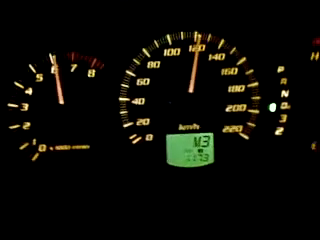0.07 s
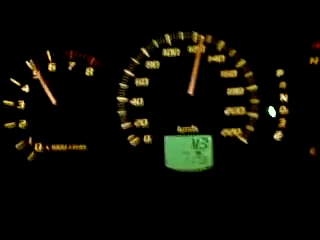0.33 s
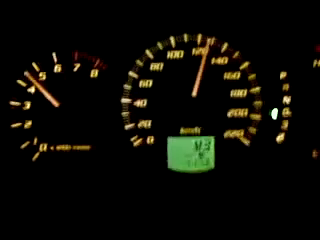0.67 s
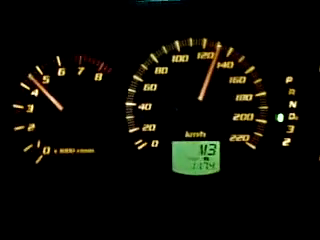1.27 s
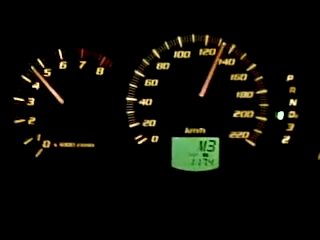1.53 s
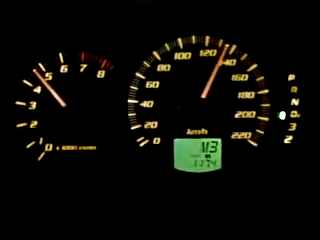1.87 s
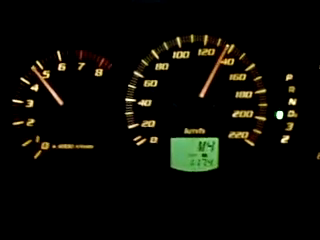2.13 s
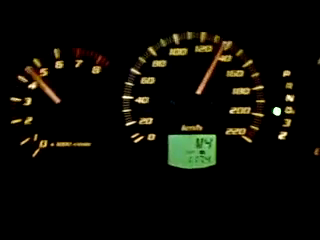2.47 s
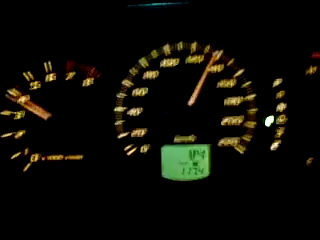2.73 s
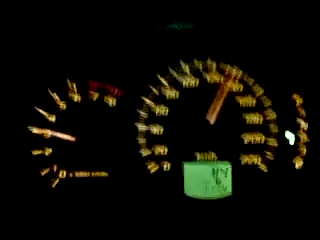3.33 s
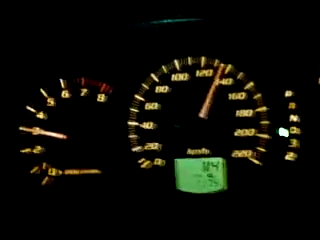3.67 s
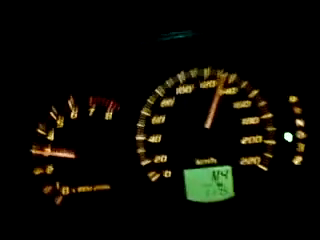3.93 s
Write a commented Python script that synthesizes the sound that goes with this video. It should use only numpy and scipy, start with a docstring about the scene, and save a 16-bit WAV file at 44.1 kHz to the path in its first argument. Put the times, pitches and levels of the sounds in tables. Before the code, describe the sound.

A turbocharged car engine drones at motorway speed, heard inside the cabin over steady road rumble and tyre roar. Its pitch drops with an upshift in the first 0.6 seconds, then climbs slowly. At about 2.4 seconds the throttle lifts and the turbo valve vents a short hiss. The engine sinks to a lower drone by 3 seconds, with soft low booms and two faint ticks near 4 seconds.

```python
"""A turbocharged four-cylinder engine drones at motorway speed, heard from inside the car.
Its firing sets the pitch, which drops with an upshift and climbs slowly under load. The throttle lifts,
the blow-off valve lets the turbo's spare air out with a hiss, and the engine sinks to a lower drone.
Road rumble, tyre roar, rushing air and low booms fill the cabin; two faint ticks come at the end."""
import sys
import numpy as np
from scipy.fft import rfft, irfft, next_fast_len
from scipy.io import wavfile
from scipy.ndimage import uniform_filter1d, map_coordinates

SR = 44100
rng = np.random.default_rng(int(sys.argv[2]) if len(sys.argv) > 2 else 0)


def bounce(signal):
    """Save signal as a 16-bit WAV file at the path given by the first command-line argument."""
    frames = np.transpose(np.atleast_2d(signal))
    limited = np.clip(frames, -1, 1)
    pcm = np.round(limited * 32767).astype(np.int16)
    wavfile.write(sys.argv[1], SR, pcm)


N = 176400  # 4 seconds

# The engine's main tone. Each row: time in seconds, firings per second, level in dB.
FIRING = [(0, 217.5, -33.5), (.1, 215, -35), (.26, 199.9, -36), (.34, 183.4, -41.5), (.395, 173.5, -31.5),
          (.46, 160.7, -35.5), (.52, 146.7, -30.5), (.58, 142.1, -33.5), (.8, 145, -30.5), (.9, 146, -36.5),
          (1.05, 146.8, -33.5), (1.5, 151.8, -34), (2.36, 156.9, -36.5), (2.5, 155.9, -42.5),
          (2.64, 154.5, -46.5), (2.7, 143, -34), (2.77, 135, -36), (2.82, 124, -39.5), (2.88, 114, -31.5),
          (2.99, 101.4, -36.5), (3.25, 102.6, -35), (3.5, 99.04, -35), (4, 97.33, -34.5)]
# How hard the engine works. Each row: time in seconds, level of overtones and growl in dB.
ENGINE_LOAD = [(0, -47.5), (.25, -42.5), (.42, -45.5), (.6, -44.5), (1.1, -46), (1.5, -45), (2, -47),
               (2.37, -46.5), (2.6, -57), (3, -55), (4, -54.5)]
# The overtones. Each entry: pitch as a multiple of the crankshaft's turning rate.
OVERTONE_MULTIPLES = [1, 1.5, 2.5, 3, 3.5, 4, 4.5, 5, 6, 7]
# Each entry: that overtone's relative level in dB.
OVERTONE_DB = [-10, -7, -9.5, -13.5, -12.5, -2, -10.5, -14, -13, -16.5]

# How loud each noise is. Each row: time in seconds, level in dB.
RUMBLE_LEVEL = [(0, -41), (.22, -36.5), (.32, -40.5), (.42, -34), (.56, -41), (.76, -36.5), (.95, -41.5),
                (1.1, -36), (1.45, -41.5), (2.08, -36), (2.3, -39.5), (2.55, -36.5), (2.95, -35.5),
                (3.05, -41.5), (3.4, -40), (3.9, -37.5)]
TYRE_LEVEL = [(0, -44.5), (.4, -43.8), (.6, -47), (1.2, -46), (2, -44.5), (3.3, -44), (4, -46)]
TREAD_LEVEL = [(0, -52), (.3, -54.5), (.85, -56.5), (2.1, -54.5), (2.46, -51), (2.65, -56), (3.2, -55),
               (4, -59.5)]
AIR_LEVEL = [(0, -60.5), (.5, -63.5), (.85, -65), (1.05, -63), (3.3, -64), (3.8, -68), (4, -65.5)]

# Each noise's colour, its mix of low and high. Each row: frequency in Hz, relative level in dB.
GROWL_COLOUR = [(100, -14.5), (220, -2.5), (330, 6.5), (450, -7), (650, -2), (900, -16), (1400, -13.5),
                (2200, -42), (4000, -61)]  # burning fuel
RUMBLE_COLOUR = [(20, -20.5), (30, -9.5), (41, -10.5), (53, -3.5), (66, -3.5), (85, -10), (120, -9),
                 (200, -43)]
TYRE_COLOUR = [(140, 5), (230, -5.5), (320, -6.5), (420, -11), (580, -11.5), (780, -17.5), (1000, -16.5),
               (1400, -18), (1750, -21.5), (2200, -27.5), (3000, -41)]
AIR_COLOUR = [(1200, -28.5), (2500, 6.5), (4000, 3.5), (5500, 2.5), (8000, 1.5), (9000, -5.5), (10000, -13),
              (11000, -18), (12500, -54)]
VENT_COLOUR = [(400, -20), (1000, -2.5), (1600, -1), (2200, -3.5), (4000, -4), (5500, -4), (6600, -2.5),
               (7800, -4.5), (9000, -11.5), (10500, -19.5), (12000, -38.5)]  # the valve's hiss
SPIT_COLOUR = [(300, -14), (550, 12), (850, 6), (1500, -14), (2800, -0.5), (4600, -3), (7000, -1),
               (9000, -5.5), (10800, -6), (12400, -19)]  # its first fast jet

# Where things ring. Each row: pitch in Hz, width in Hz, relative level in dB.
TREAD_RINGS = [(910, 29, -8), (1127, 81, 6), (1325, 42, 3), (1628, 69, -4.5), (1905, 35, -6),
               (2103, 36, -8.5)]  # tyre tread and car body
PIPE_RINGS = [(1379.2, 46, 3), (1570.3, 44, 14), (1730, 54, -3), (2840, 47, 3), (4660, 130, -3.5),
              (6300, 65, 0), (6600, 40, 2), (6930, 100, 0)]  # the valve's pipe

# Booms of the car body. Each row: middle in seconds, pitch in Hz, fade time in seconds, peak in dB.
BOOMS = [(0.489, 55.4, 0.017, -26), (2.466, 62.4, 0.018, -24), (2.874, 57.88, 0.026, -28.5),
         (3.14, 56.05, 0.041, -32.5), (3.576, 55.5, 0.095, -29), (3.751, 56.3, 0.054, -31)]
# Puffs in the intake pipe. Each row: middle and fade time in seconds, pitch and width in Hz, level in dB.
CHUFFS = [(2.44, 0.02, 2200, 902.5, -51.5), (2.469, 0.0099, 3780, 1800, -50), (2.531, 0.013, 560, 120, -44),
          (2.598, 0.0119, 1620, 250, -57), (2.632, .03, 6500, 1100, -53)]
# Small clicks. Each row: start in seconds, level in dB (before the sound is halved), pitch in Hz.
TICKS = [(3.944, -51.5, 6050), (3.9562, -49, 6100)]


def amp(db):
    """Turn decibels into a number to multiply by."""
    return 10 ** (np.asarray(db) / 20)


def unit(x):
    """Scale a sound to an average strength (rms) of 1."""
    return x / np.sqrt(np.mean(x ** 2) + 1e-20)


def clock():
    """The time of each sample in seconds."""
    return np.arange(N) / SR


def curves(rows):
    """Join timed rows with straight lines: one curve for each column after the time."""
    times, *columns = np.transpose(rows)
    return [np.interp(clock(), times, column) for column in columns]


def wobble(rate):
    """A smooth curve through `rate` random points a second."""
    return map_coordinates(rng.standard_normal(1024), [clock() * rate + 2], mode="wrap")


def filtered(x, response):
    """Multiply each frequency in x by response(hz)."""
    size = next_fast_len(N + SR // 2)
    return irfft(rfft(x, size) * response(np.fft.rfftfreq(size, 1 / SR)), size)[:N]


def noise(colour):
    """Noise of strength 1, shaped by a colour table and falling away beyond its ends."""
    freqs, db = np.transpose(colour)
    freqs = np.r_[freqs[0] / 2, freqs, freqs[-1] * 2]
    db = np.r_[db[0] - 40, db, db[-1] - 40]
    response = lambda hz: amp(np.interp(np.log(hz + 1), np.log(freqs), db))
    return unit(filtered(rng.standard_normal(N), response))


def ringing(rings):
    """Noise of strength 1 that rings around the given pitches."""
    response = lambda hz: sum(amp(db) / (1 + 2 * ((hz - pitch) / width) ** 2)
                              for pitch, width, db in rings)
    return unit(filtered(rng.standard_normal(N), response))


def engine():
    """Cylinders firing twice per crankshaft turn make a drone; load adds overtones and a pulsing growl."""
    firing_hz, firing_db = curves(FIRING)
    load_db, = curves(ENGINE_LOAD)
    crank_angle = np.pi * np.cumsum(firing_hz) / SR
    firing = np.sin(2 * crank_angle)
    drone = amp(firing_db + wobble(29.953)) * firing
    overtones = np.zeros(N)
    for multiple, db in zip(OVERTONE_MULTIPLES, OVERTONE_DB):
        gain = amp(db + 2 * wobble(24))
        drift = rng.uniform(0, 2 * np.pi) + 0.43 * wobble(22.03)
        overtones += gain * np.sin(multiple * crank_angle + drift)
    # The drivetrain shudders as the new gear bites, so the overtones come and go.
    bite_s, fade_s, shudder_hz = 0.515, 0.2, 7.9
    since = clock() - bite_s
    shudder_db = 5 * np.exp(-(since / fade_s) ** 2) * (np.cos(2 * np.pi * shudder_hz * since) - .5)
    growl = amp(-4.5) * unit(noise(GROWL_COLOUR) * (1 + .5 * firing))
    return np.sqrt(2) * drone + amp(load_db) * (np.sqrt(2) * amp(shudder_db) * overtones + growl)


def road():
    """The uneven road makes the cabin rumble; the tyres roar and their tread sings."""
    rumble_db, = curves(RUMBLE_LEVEL)
    tyre_db, = curves(TYRE_LEVEL)
    tread_db, = curves(TREAD_LEVEL)
    rumble = noise(RUMBLE_COLOUR)
    rumble /= np.sqrt(np.abs(uniform_filter1d(rumble ** 2, size=5000)) + 1e-6)  # even out random swells
    roar = amp(tyre_db + 0.92 * wobble(8)) * noise(TYRE_COLOUR)
    tread = amp(tread_db + wobble(17)) * ringing(TREAD_RINGS)
    return amp(rumble_db) * rumble + roar + tread


def rushing_air():
    """Wind and air drawn into the engine make a soft hiss."""
    level_db, = curves(AIR_LEVEL)
    return amp(level_db + 0.17 * wobble(12)) * noise(AIR_COLOUR)


def body_booms():
    """Bumps and the drivetrain going slack make the cabin swell briefly with its lowest note."""
    t = clock()
    return sum(amp(db) * np.exp(-((t - middle) / fade) ** 2) * np.cos(2 * np.pi * hz * (t - middle))
               for middle, hz, fade, db in BOOMS)


def blow_off_valve():
    """The valve leaks, snaps open with a spit, then drains the pressure in a hiss that rings the pipe."""
    leak_s, open_s, rise_s = 2.355, 2.47, 0.023
    leak_db_per_s, drain_db_per_s, spit_db_per_s = 116, 38, 130
    t = clock()
    before, since = np.maximum(open_s - t, 0), np.maximum(t - open_s, 0)
    leak = amp(-4.5 - leak_db_per_s * before) * np.clip((t - leak_s) / rise_s, 0, 1)
    opening = np.maximum(leak, np.clip(1 - before / rise_s, 0, 1))
    hiss = noise(VENT_COLOUR) + amp(-9.5) * ringing(PIPE_RINGS)
    vent = amp(-43.5 - drain_db_per_s * since) * hiss
    spit = amp(-45.5 - spit_db_per_s * since) * noise(SPIT_COLOUR)
    flutter = amp(0.85 * wobble(70))  # the jet is unsteady
    return opening * (vent + spit) * flutter


def intake_chuffs():
    """Air turns round in the intake pipe, and each puff rings at one pitch."""
    return sum(amp(db) * np.exp(-((clock() - middle) / fade) ** 2) * ringing([(hz, width, 0)])
               for middle, fade, hz, width, db in CHUFFS)


def ticks():
    """Tiny dry clicks in the cabin start sharply and die at once."""
    fade_s, width_hz = 0.015, 1000  # each falls 60 dB in fade_s
    t = clock()
    clicks = np.zeros(N)
    for start, db, hz in TICKS:
        gain = (t >= start) * amp(db - 60 * np.abs(t - start) / fade_s)
        clicks += gain * ringing([(hz, width_hz, 0)])
    return clicks / 2


def scene():
    """Everything as heard from the driver's seat, in one channel."""
    mix = engine() + road() + rushing_air() + body_booms() + blow_off_valve() + intake_chuffs() + ticks()
    return mix[None]


def record(dry):
    """Start and stop the sound softly, and cut off the highest treble."""
    fade_s, top_hz = .004, 12450
    fade = np.clip(np.minimum(clock(), clock()[::-1]) / fade_s, 0, 1)
    return np.array([filtered(channel * fade, lambda hz: hz < top_hz) for channel in dry])


dry = scene()
out = record(dry)
bounce(out)
```